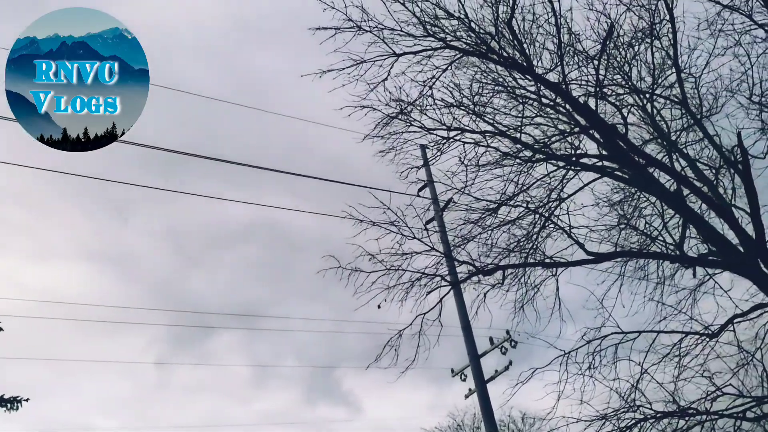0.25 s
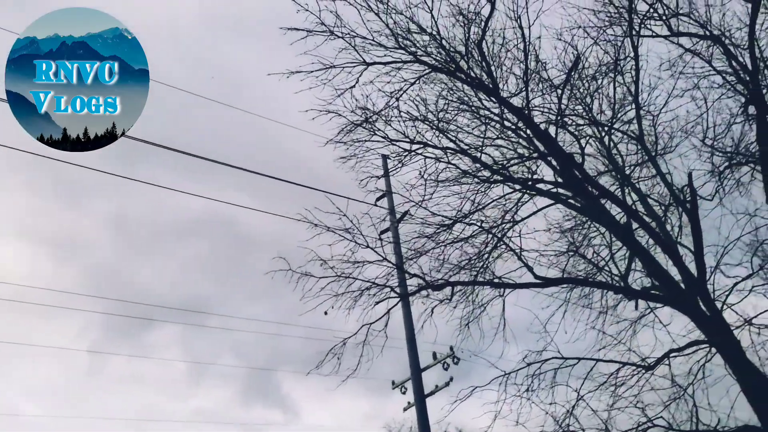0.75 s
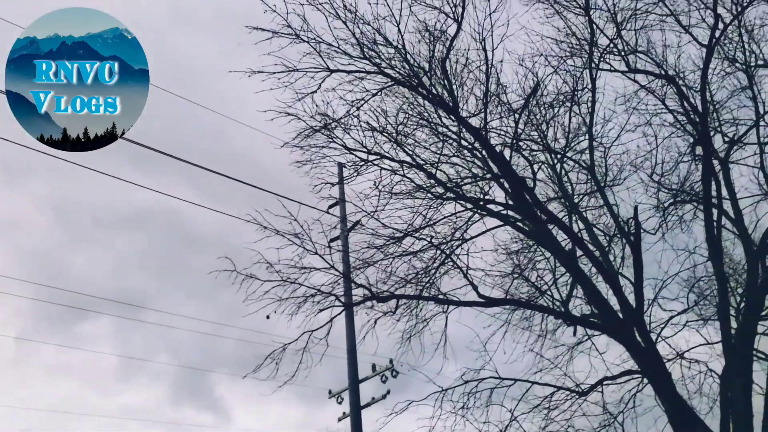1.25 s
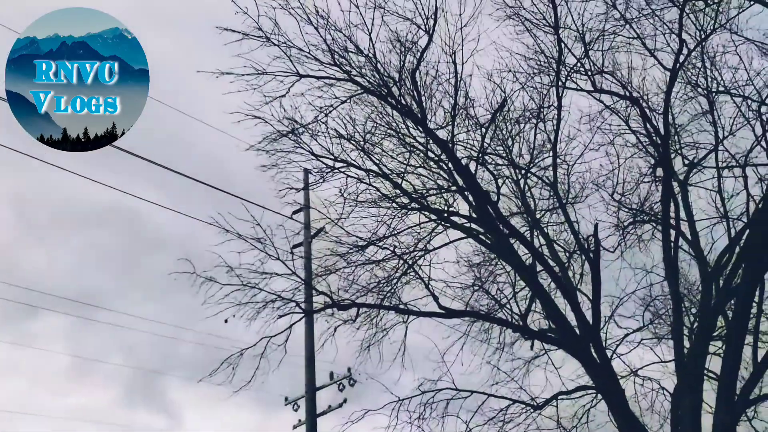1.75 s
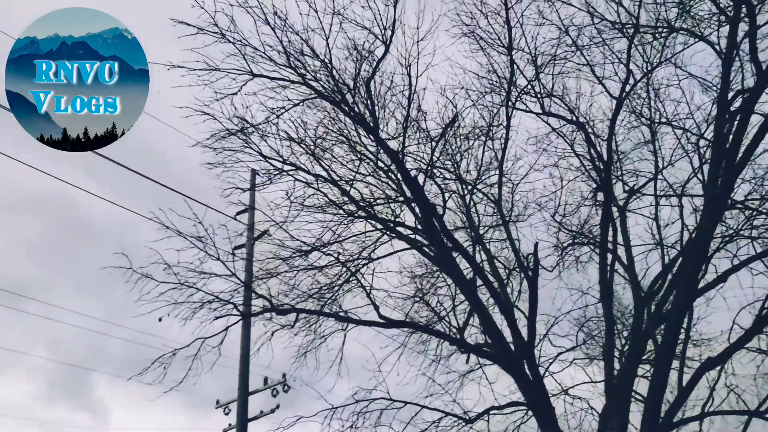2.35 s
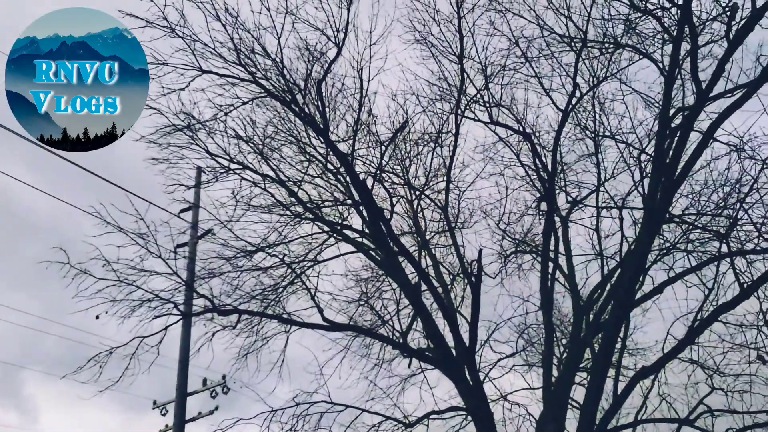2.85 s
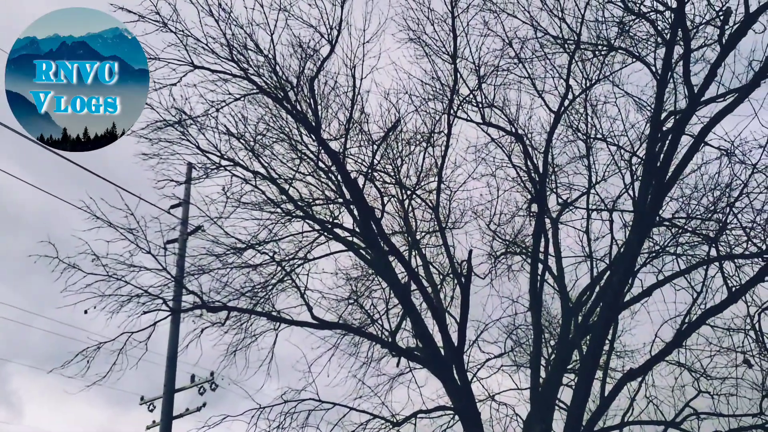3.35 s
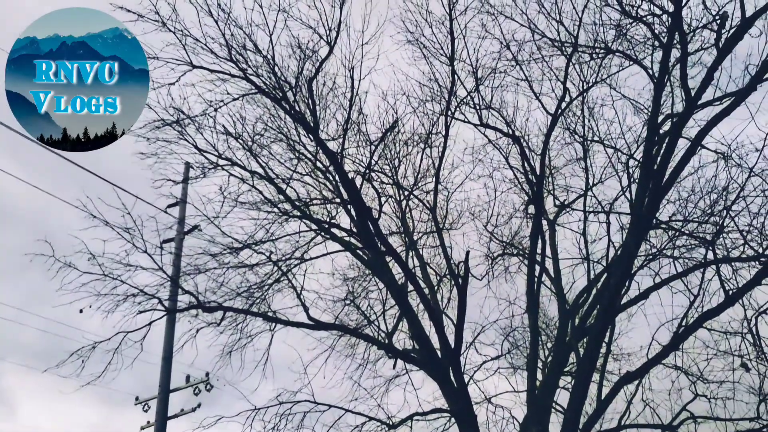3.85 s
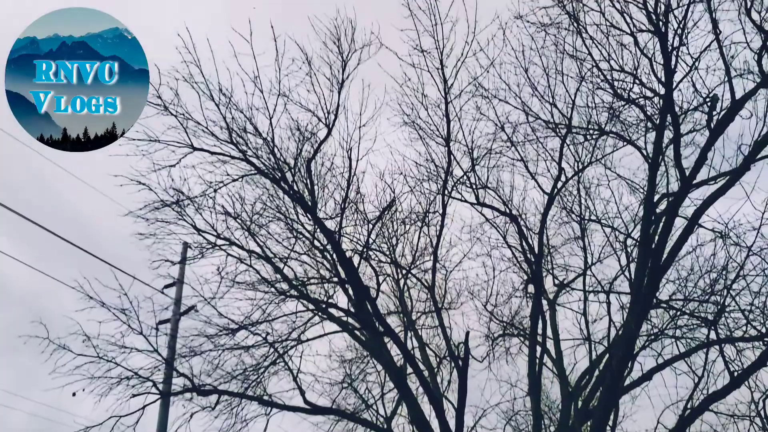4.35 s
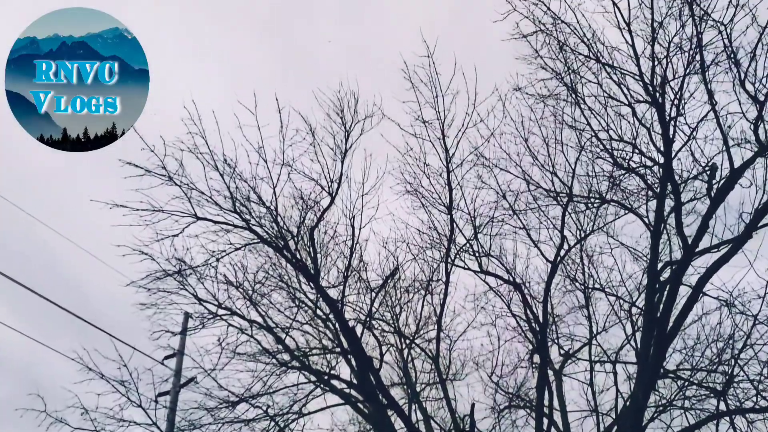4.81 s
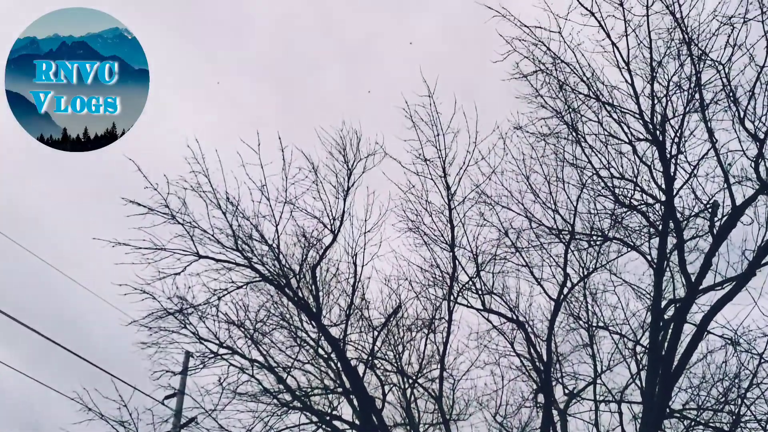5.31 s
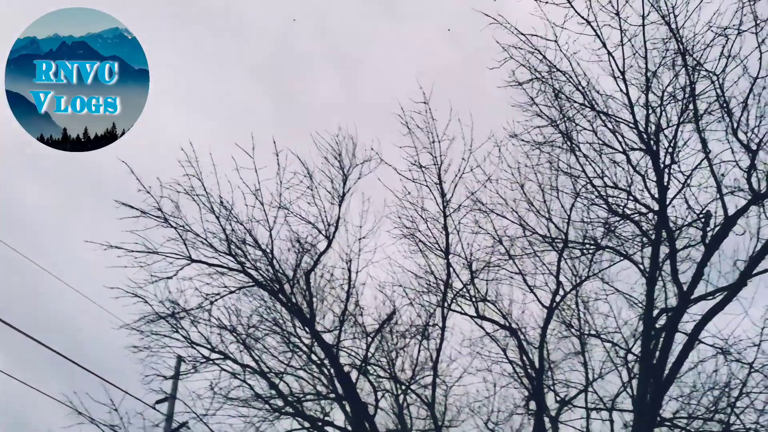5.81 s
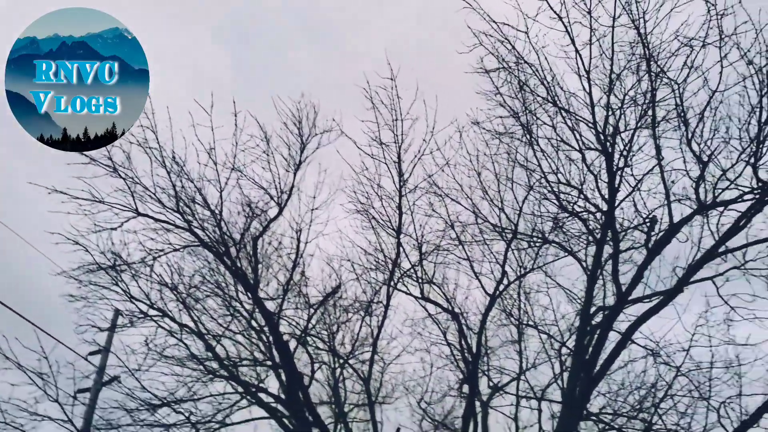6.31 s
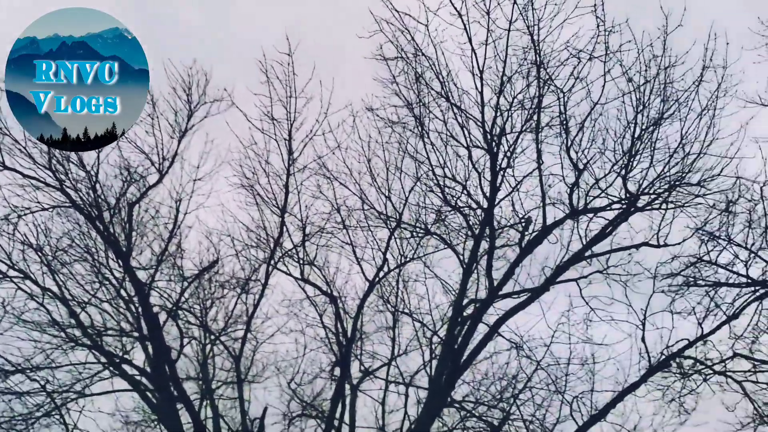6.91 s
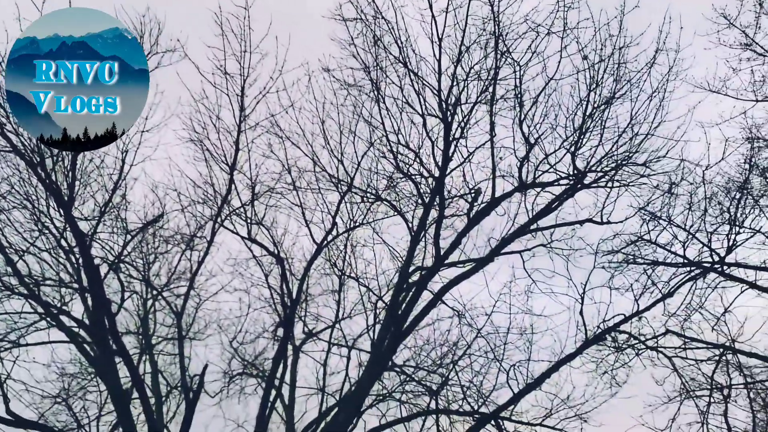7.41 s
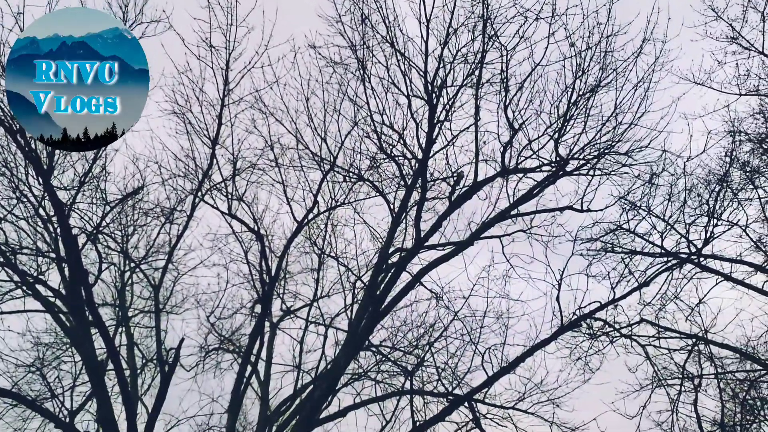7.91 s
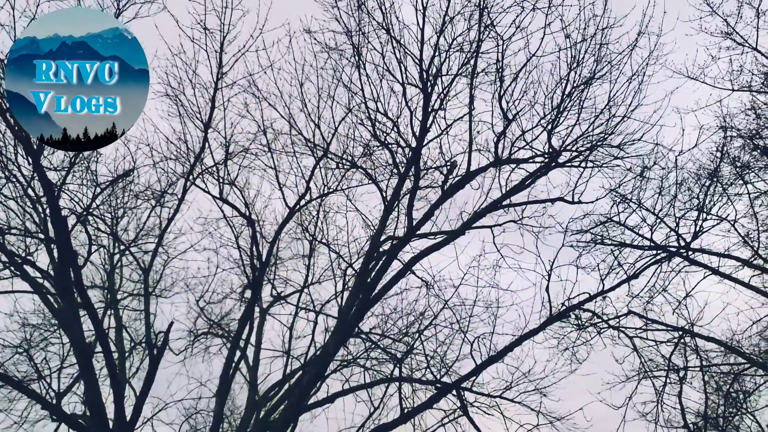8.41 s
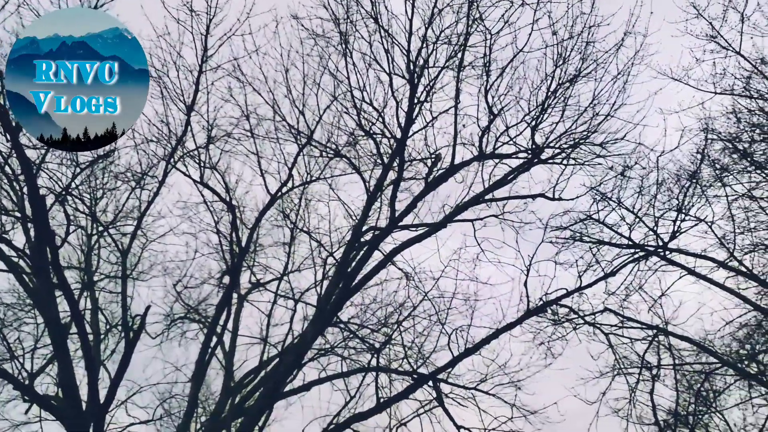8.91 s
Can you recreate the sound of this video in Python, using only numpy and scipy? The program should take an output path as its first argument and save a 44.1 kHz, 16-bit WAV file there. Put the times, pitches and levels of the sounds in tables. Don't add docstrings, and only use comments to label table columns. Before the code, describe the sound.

An open street with bare trees, heard through a hand-held stereo microphone. Crisp arched chirps from two sparrows stand well above a quiet, uneven low traffic rumble. Distant birds pipe and blur into their echoes; a thrush chucks softly in the last two seconds. Barely audible machine hum swells, and small twig or handling clicks appear on the left and later far right. The final loud chirp comes from another spot.

```python
import sys
import numpy as np
from scipy import signal
from scipy.fft import rfft, irfft, next_fast_len
from scipy.io import wavfile
from scipy.ndimage import uniform_filter1d, map_coordinates

SR = 44100
rng = np.random.default_rng(int(sys.argv[2]) if len(sys.argv) > 2 else 0)


def generate_wav(sig):
    pcm = np.round(np.clip(np.atleast_2d(sig).T, -1, 1) * 32767).astype(np.int16)
    wavfile.write(sys.argv[1], SR, pcm)


def ratio(d):
    e = np.asarray(d, float) / 20
    return 10 ** e


N = 403956

# (time [s], level [dB])
TRAFFIC_LEVEL = [(0.0, -56), (0.74, -53.5), (1.3, -57.5), (1.84, -49), (2.65, -56), (3.05, -58),
                 (3.47, -48.5), (4.2, -55.5), (4.67, -58), (4.95, -46.5), (5.4, -53), (5.65, -49),
                 (6.12, -54.5), (6.48, -50.5), (7.0, -55), (7.8, -55), (9.16, -53.5)]
# (frequency [Hz], density [dB per Hz])
RUMBLE_COLOUR = [(12, -53), (20, -22.5), (53, -0.5), (70, 1.5), (123, -8), (146, -15), (188, -22.5),
                 (250, -25.5), (320, -41), (550, -120)]
# (time [s], level [dB])
TYRE_LEVEL = [(0.0, -78), (0.4, -79), (0.89, -72.5), (1.4, -78.5), (2.3, -74.5), (3.03, -81), (3.42, -74),
              (4.5, -80), (4.95, -75), (5.9, -76), (6.6, -72.5), (7.2, -78.5), (9.16, -75.5)]
# (frequency [Hz], density [dB per Hz])
TYRE_COLOUR = [(110, -18.5), (180, -4), (248, -7), (300, -3), (529, -15.5), (844, -15), (1030, -22),
               (1600, -18), (2080, -16), (3520, -120)]
# (frequency [Hz], density [dB per Hz])
AIR_COLOUR = [(700, -32), (1000, -7), (1500, -11.5), (2200, -5.5), (2700, -9.5), (3600, -46), (4700, -17.5),
              (5800, -17.5), (6750, -5.5), (7450, -19.5), (8200, -16.5), (9350, -23.5), (13300, -10.5),
              (15600, -15)]
# (frequency [Hz], correlation [0-1])
LIKENESS = [(40, 0), (70, .3), (130, .6), (290, .8), (640, .45), (1400, .55), (3000, .3), (7000, .15)]
# (frequency [Hz], left minus right [dB])
BALANCE = [(60, 2.5), (110, -2.5), (200, 1), (380, 0), (700, 2.5), (1290, -2.5), (2380, -4.5), (4400, 22.5),
           (8120, 14.5), (15000, 10)]

# (frequency [Hz], idle level [dB])
MACHINE_TONES = [
    (296, -75),
    (588, -85.5),
    (356.5, -88),
]
# (centre [s], half length [s], peak level [dB])
LOAD_SURGES = [
    [(.9, 1, -72.5), (5.2, 0.77, -65.5), (9.1, 0.33, -71)],
    [(2.9, 0.16, -91), (8.5, 0.35, -73)],
    [(.8, 1, -74.5), (2.3, 0.63, -76), (3.4, 0.19, -67), (4.8, .4, -75.5), (7, 1, -85.5), (9.1, 0.34, -87)],
]

# (time [s], level [dB])
FLOCK_LEVEL = [(0.0, -79.5), (0.43, -70), (1.43, -71.5), (1.71, -62), (3.14, -78), (3.44, -65.5),
               (4.28, -85.5), (4.97, -66), (5.99, -82.5), (6.76, -65.5), (7.24, -72.5), (9.16, -70)]

# (time [s], peak level [dB], centre [Hz])
SNAPS = [
    (.036, -57, 750),
    (.498, -58, 6000),
    (4.24, -63, 5500),
    (7.065, -62, 4800),
    (7.312, -62, 4700),
    (7.44, -61, 4700),
]
# (time [s], peak level [dB], left minus right [dB])
TICKS = [
    (1.1238, -47, 18),
    (2.9317, -54, 14),
    (4.5321, -56, 9.5),
    (6.0422, -52, 11.0),
    (7.7857, -50, -20),
]

# (time [s], length [s], first pitch [Hz], level [dB])
RISES = [
    (.08, .04, 2700, -70),
    (1.8, .025, 3900, -64),
    (.076, .02, 3400, -74),
    (1.4, .04, 5400, -81),
]
FALLS = [
    (.329, 0.036, 3610, -66),
    (1.12, 0.031, 3500, -77),
    (1.263, 0.043, 3620, -78),
    (1.817, 0.035, 4030, -62),
    (1.7, 0.046, 3950, -64),
    (1.97, 0.027, 4300, -64.5),
    (3.88, 0.039, 3520, -75.5),
    (5.488, 0.043, 3990, -74),
]
SEETS = [
    (.335, .024, 6400, -75),
    (1.486, .012, 5000, -71),
    (5.058, .045, 8400, -74),
    (5.099, .043, 7200, -67),
    (6.112, .04, 9000, -78),
    (7.907, .027, 7500, -82),
]
PIPES = [(1.056, 0.022, 3430, -75), (3.08, 0.078, 3000, -74), (3.155, 0.058, 2950, -71),
         (3.291, .04, 2750, -67), (5.277, 0.087, 2790, -73), (6.083, 0.019, 2580, -77),
         (6.56, 0.0466, 2680, -73), (7.1, 0.039, 2640, -78), (7.263, 0.034, 2980, -71),
         (7.322, 0.044, 3030, -75), (7.4, .04, 3000, -87), (7.49, .05, 3010, -90), (7.96, 0.027, 3120, -70),
         (8.013, 0.056, 2580, -76)]
CHEEPS = [
    (1.235, 0.084, 4720, -76),
    (1.415, .028, 3990, -60),
    (1.931, .04, 3980, -62),
    (2.107, 0.052, 4340, -67),
    (5.315, 0.05, 3934, -64),
    (7.61, .05, 4780, -88),
    (7.79, 0.061, 4890, -81),
    (7.886, 0.047, 4920, -79),
    (8.11, .04, 4810, -80),
]
COOS = [
    (5.966, 0.36, 1330, -89),
    (6.42, 0.126, 1222, -87.5),
]
# (calls [table], last pitch over first [ratio], left minus right [dB])
FAR_KINDS = [
    (FALLS, .6, 2.64),
    (RISES, 1.28, 15),
    (CHEEPS, 1.04, 4.4),
    (PIPES, 1.01, 0),
    (SEETS, .87, 18),
    (COOS, .92, -13),
]
# (time [s], first pitch [Hz], level [dB], upper tone level [dB])
CHUCKS = [
    (1.115, 1900, -74, -80),
    (3.875, 1800, -68, -78),
    (7.18, 1900, -57, -60),
    (7.568, 1780, -60, -59),
    (7.69, 2100, -70, -84),
    (7.84, 2250, -62, -80),
    (7.87, 1760, -61, -72),
    (8.062, 1870, -68, -80),
    (8.25, 1900, -65, -82),
    (8.458, 1850, -68, -80),
]

# (time [s], length [s], crest [Hz], plateau level [dB], fall level [dB])
THIN_CHIRPS = [
    (.21, 0.095, 4950, -50.5, -54.5),
    (.685, 0.086, 4940, -46.5, -48),
    (2.152, 0.092, 4660, -46.5, -47),
    (2.62, 0.1, 4780, -52.5, -47.5),
    (4.414, .091, 4980, -52.5, -56),
    (6.215, 0.083, 4790, -48.5, -47),
    (6.61, 0.092, 4940, -50.5, -53),
]
# (plateau [Hz], level [dB], pitch where the fall is loudest [Hz], left delay [samples])
THIN_UPPER = [(7700, -71.5, 2500, -25.5), (8160, -64.5, 3550, -19), (7760, -63, 5500, -11.5),
              (8320, -67.5, 4600, -2.5), (8100, -75, 3000, -23), (8190, -67.5, 3900, -7.5),
              (8550, -71, 4100, -8.5)]
# (time [s], length [s], crest [Hz], plateau level [dB], fall level [dB])
LOUD_CHIRPS = [
    (.535, .088, 4110, -42.5, -36.5),
    (1.555, 0.081, 4400, -45, -44),
    (2.493, .096, 4630, -46.5, -44),
    (3.312, 0.091, 4300, -46, -44),
    (4.759, .091, 4590, -44, -40.5),
    (6.761, 0.084, 4600, -40.5, -41),
    (8.603, 0.093, 4000, -38, -44),
]
# (plateau [Hz], level [dB], pitch where the fall is loudest [Hz], left delay [samples])
LOUD_UPPER = [(7630, -58, 3600, 15), (7100, -56.5, 2730, 13), (8250, -52, 2730, 10.5),
              (7230, -54.5, 2600, 10.5), (7780, -53.5, 2750, 11.5), (7800, -50, 2850, 15.5),
              (7210, -48.5, 2680, -20)]
# crest [share of length], bend of the fall [exponent], pitches [Hz],
# follow of the crest [share], knee [ratio], stage levels [dB], echo levels and pan [dB]
THIN_HABIT = dict(crest=.6, bend=1.0, end_hz=2050, onset_hz=2750, plateau_hz=4520, usual_hz=4750, follow=.2, knee=.95, rise_db=(-27, -10, 0, -7),
              end_db=-27, upper_db=(2, 2, 0, -2, -12, -16), slap_db=-22, near_db=-10, pan_db=5)
LOUD_HABIT = dict(crest=.66, bend=1.4, end_hz=1700, onset_hz=2100, plateau_hz=4000, usual_hz=4050, follow=.45, knee=.93, rise_db=(-24, -5, 0, 1),
              end_db=-24, upper_db=(-10, 1, 0, -6, -22, -28), pan_db=2.6, slap_db=-14, near_db=-10)
MOVED_HABIT = dict(LOUD_HABIT, slap_db=-24, near_db=-13, pan_db=6)
RISE_STAGES = (0, .18, .37)
UPPER_ARCH = (0.522, 0.861, 1, 1.028)

# (frequency [Hz], t60 [s])
FRONT_DECAY = [(1500, .6), (3000, .75), (4500, .6), (9000, .3), (14000, .6)]
# (frequency [Hz], gain [dB])
ECHO_COLOUR = [(1500, 13.5), (2500, 3), (3500, 4.5), (4500, 8.5), (7000, 6), (12000, 9)]
# (frequency [Hz], gain [dB])
MIC_COLOUR = [(1500, 4.5), (2500, 9), (3500, 3), (5500, 4), (8000, 1), (9500, -5.5), (10500, 2.5),
              (12000, 3), (15000, -14)]


def unit(x):
    return x / np.sqrt(np.mean(x ** 2) + 1e-20)


def along(points, hz):
    f, v = np.transpose(points)
    return np.interp(np.log(hz + 1), np.log(f + 1), v)


def curves(rows):
    s, *cols = np.transpose(rows)
    return [np.interp(np.arange(N) / SR, s, c) for c in cols]


def wobble(rate, size=N):
    knots = rng.standard_normal(int(size * rate / SR) + 4)
    return map_coordinates(knots, [np.arange(size) * rate / SR])


def filtered(x, response):
    m = next_fast_len(x.shape[-1] + 8192)
    spectrum = rfft(x, m) * response(np.fft.rfftfreq(m, 1 / SR))
    return irfft(spectrum, m)[..., :x.shape[-1]]


def add(mix, s, sound):
    part = mix[:, round(s * SR):][:, :sound.shape[1]]
    part += sound[:, :part.shape[1]]


def phase(hz):
    return 2 * np.pi * np.cumsum(hz) / SR


def rush(spectrum, patchy_db, lag_s):
    z = signal.stft(rng.standard_normal((2, N)), nperseg=512)[2]
    patches = uniform_filter1d(rng.standard_normal(z.shape[1:]), size=6, axis=0)
    patches = uniform_filter1d(patches, size=14, axis=1)
    pair = signal.istft(z * ratio(patchy_db * unit(patches)), nperseg=512)[1][:, :N]

    def mid_side(hz):
        turn = np.arccos(np.clip(along(LIKENESS, hz), -1, 1)) / 2
        return ratio(along(spectrum, hz)) * [np.cos(turn), np.sin(turn)]

    def left_right(hz):
        half = np.array([[.5], [-.5]])
        return ratio(half * along(BALANCE, hz)) * np.exp(-2j * np.pi * hz * lag_s * half)

    mid, side = filtered(pair, mid_side)
    return unit(filtered(np.array([mid + side, mid - side]), left_right))


def traffic():
    level_db, = curves(TRAFFIC_LEVEL)
    unsteady_db = 5 + 1.95 * wobble(7)
    sway_db = np.array([[.5], [-.5]]) * (1.0 + wobble(2.966))
    return ratio(level_db + unsteady_db + sway_db) * rush(RUMBLE_COLOUR, patchy_db=1.83, lag_s=0.000096)


def tyres():
    level_db, = curves(TYRE_LEVEL)
    return ratio(level_db + 11.5 + 0.35 * wobble(6.9)) * rush(TYRE_COLOUR, patchy_db=1.5, lag_s=0.00025)


def air():
    return ratio(-70.5 + .6 * wobble(14)) * rush(AIR_COLOUR, patchy_db=.6, lag_s=.00035)


def hum():
    t, mix = np.arange(N) / SR, 0
    for (hz, idle_db), surges in zip(MACHINE_TONES, LOAD_SURGES):
        swells = sum(ratio(db) * np.exp(-((t - s) / half) ** 2) for s, half, db in surges)
        size = (ratio(idle_db) + swells) * ratio(2.5 + 2.0 * wobble(6))
        mix = mix + size * np.sin(phase(hz + 1.49 * wobble(4)))
    return mix * ratio([[1.2], [-1.2]])


def street(x, slap_db, near_db, tail_db, pan_db, lag=None):
    hz, t, z = signal.stft(rng.standard_normal((2, SR * 3 // 4)), SR, nperseg=256)
    decay = ratio(-60 * t / along(FRONT_DECAY, hz)[:, None])
    tail = signal.istft(z * decay, SR, nperseg=256)[1]
    t = np.arange(tail.shape[1]) / SR
    near = rng.standard_normal(tail.shape) * ratio(-60 * t / .25) * (1 - np.exp(-t / .012))
    slap = rng.standard_normal(tail.shape) * np.exp(-((t - .032) / .0008) ** 2)
    layers = ((tail_db, tail), (near_db, near), (min(slap_db, -5), slap))
    answer = sum(ratio(db) * part / np.linalg.norm(part[0]) for db, part in layers)
    answer = filtered(answer, lambda hz: ratio(along(ECHO_COLOUR, hz)))
    when, size = rng.random((2, 2, 4))
    answer[[[0], [1]], (60 + when * .012 * SR).astype(int)] += ratio(-13) * (2 * size - 1)
    lag = int(np.clip(-5 * pan_db if lag is None else lag, -30, 30))
    answer[0, 20 + lag // 2] += ratio(pan_db / 2)
    answer[1, 20 + lag // 2 - lag] += ratio(-pan_db / 2)
    return signal.fftconvolve(x[None], answer, axes=1)


def note(length, first_hz, last_hz, bend):
    u = np.arange(round(length * SR)) / (length * SR)
    hz = first_hz + (last_hz - first_hz) * u ** bend
    swell = np.sin(np.pi * u ** .8) ** .6 * ratio(2 + 3 * wobble(120, size=len(u)))
    return phase(hz * (1 + .014 * wobble(200, size=len(u)))), swell


def flock(count):
    calls = np.zeros((1, N))
    for when, top, fall, size in rng.random((count, 4)):
        turn, swell = note(.06, 3100 + 1700 * top, 1700 + 700 * fall, bend=1.3)
        add(calls, when * N / SR, ratio(-14 * size) * swell[None] * np.sin(turn))
    heard = street(calls[0], slap_db=-20, near_db=7, tail_db=13, pan_db=5)
    add(heard, 0, heard[:, N:].copy())
    return ratio(curves(FLOCK_LEVEL)[0]) * unit(heard[:, :N])


def ticks():
    mix, t = np.zeros((2, N)), np.arange(SR // 30) / SR
    for s, db, pan_db in TICKS:
        click = np.diff(rng.standard_normal(len(t) + 1)) * ratio(db - 15.0 - 60 * t / 0.013)
        add(mix, s, click * ratio([[pan_db / 2], [-pan_db / 2]]))
    for s, db, hz in SNAPS:
        grit = np.array([wobble(hz * 1.6, size=len(t)), wobble(hz * 0.27, size=len(t))])
        envelope = ratio(db - 60 * t / 0.07) * np.minimum(1, t / 0.0013)
        add(mix, s, grit * np.sin(2 * np.pi * hz * t) * envelope)
    return mix


def far_birds():
    mix = np.zeros((2, N))
    for rows, glide, pan_db in FAR_KINDS:
        for s, length, first_hz, db in rows:
            turn, swell = note(length, first_hz, glide * first_hz, bend=0.92)
            whistle = ratio(db) * swell * np.sin(turn)
            add(mix, s, street(whistle, slap_db=-29, near_db=-3.5, tail_db=-2, pan_db=pan_db))
    return mix


def stages(row, upper, habit):
    s, length, crest_hz, db, fall_db = row
    high_hz, high_db, loud_fall_hz, _ = upper
    crest, end_hz = habit["crest"], habit["end_hz"]
    flat_hz = habit["plateau_hz"] + habit["follow"] * (crest_hz - habit["usual_hz"])
    fallen = ((crest_hz - loud_fall_hz) / (crest_hz - end_hz)) ** (1 / habit["bend"])
    falling_hz = np.array([loud_fall_hz, end_hz])
    times = s + length * np.r_[RISE_STAGES, crest, crest + fallen * (1 - crest), 1]
    low_pitch = np.r_[habit["onset_hz"], habit["knee"] * flat_hz, flat_hz, crest_hz, falling_hz]
    low_level = np.r_[db + np.array(habit["rise_db"]), fall_db, fall_db + habit["end_db"]]
    high_pitch = np.r_[high_hz * np.array(UPPER_ARCH), 1.8 * falling_hz]
    return times, low_pitch, low_level, high_pitch, high_db + np.array(habit["upper_db"])


def sparrow(rows, uppers, habit):
    mix = np.zeros((2, N))
    for row, upper in zip(rows, uppers):
        s, hz, db, high_hz, high_db = stages(row, upper, habit)
        t = np.arange(s[0], s[-1], 1 / SR)
        size = len(t)
        cols = [np.interp(t, s, c) for c in (hz, ratio(db), high_hz, ratio(high_db))]
        hz, loud, high_hz, high_loud = (uniform_filter1d(c, size=200, mode="nearest") for c in cols)
        low = phase(hz * (1 + .008 * wobble(250, size=size)))
        high = phase(high_hz)
        sum_tone = np.sin(low + high)
        summed = ratio(along([(9500, -37), (11000, -6.0)], hz + high_hz)) * sum_tone
        rasp = ratio(-6.5) * unit(wobble(3000, size=size)) * (np.sin(high) + ratio(-23.5) * sum_tone)
        breath = 1 + ratio(-18.5) * unit(wobble(2500, size=size))
        voice = loud * np.sin(low) * breath
        voice += high_loud * (np.sin(high) + summed + rasp + ratio(-10) * np.sin(2 * low + high))
        voice += high_loud * ratio(-12) * (np.sin(high - low) + np.sin(2 * low) + np.sin(3 * low))
        edge = np.minimum(1, np.minimum(t - s[0], s[-1] - t) / 0.001)
        flutter = ratio(-0.5 + 4.5 * wobble(145.2, size=size))
        heard = street(voice * edge * flutter, habit["slap_db"], habit["near_db"], tail_db=-11,
                       pan_db=habit["pan_db"], lag=upper[3])
        add(mix, s[0], heard)
    return mix


def thrush():
    mix = np.zeros((2, N))
    for s, first_hz, db, upper_db in CHUCKS:
        turn, swell = note(.036, first_hz, .7 * first_hz, bend=2.8)
        voice = swell * (ratio(db) * np.sin(turn) + ratio(upper_db) * swell * np.sin(1.62 * turn))
        add(mix, s, street(voice, slap_db=-20, near_db=-15, tail_db=-18, pan_db=-5))
    return mix


def ground(hz):
    return ratio(along(MIC_COLOUR, hz)) * (1 - .33 * np.exp(-2j * np.pi * hz * .00099))


def scene():
    background = traffic() + tyres() + air() + hum()
    birds = flock(count=400) + far_birds() + thrush()
    birds += sparrow(THIN_CHIRPS, THIN_UPPER, THIN_HABIT)
    birds += sparrow(LOUD_CHIRPS[:-1], LOUD_UPPER, LOUD_HABIT)
    birds += sparrow(LOUD_CHIRPS[-1:], LOUD_UPPER[-1:], MOVED_HABIT)
    return filtered(birds, ground) + ticks() + background


def roll_off(x):
    return signal.sosfilt(signal.butter(12, 15710, fs=SR, output="sos"), x)


def record(dry):
    return roll_off(dry)


dry = scene()
out = record(dry)
generate_wav(out)
```